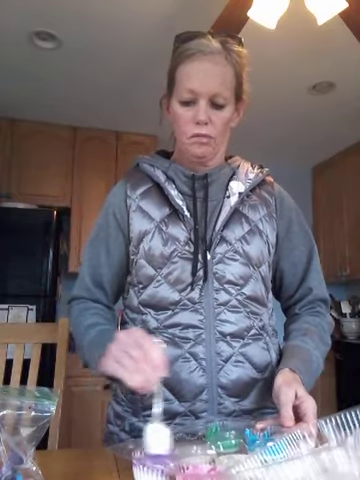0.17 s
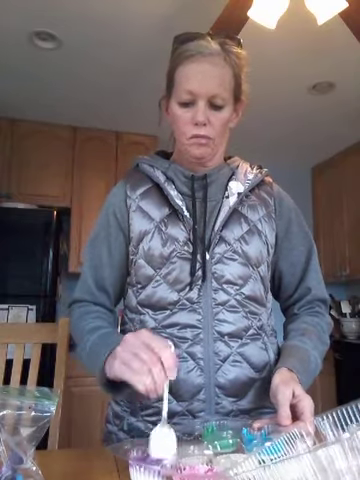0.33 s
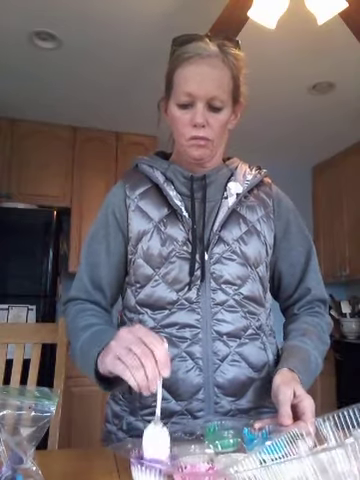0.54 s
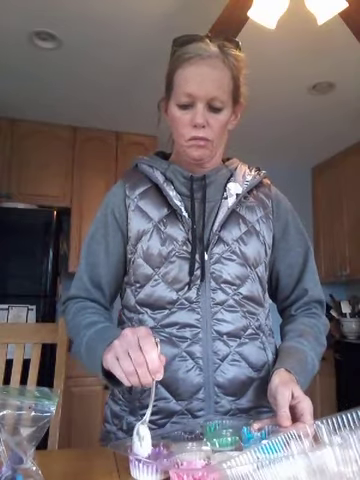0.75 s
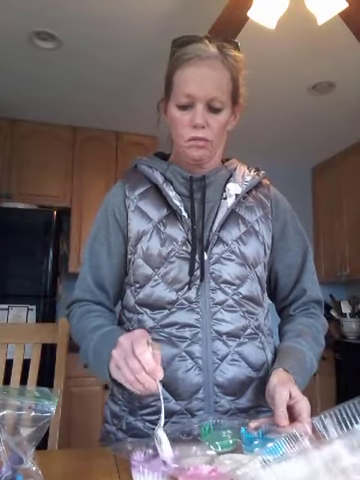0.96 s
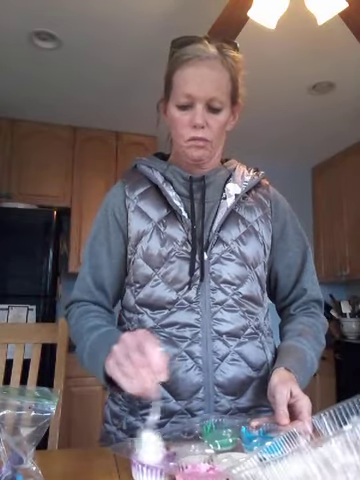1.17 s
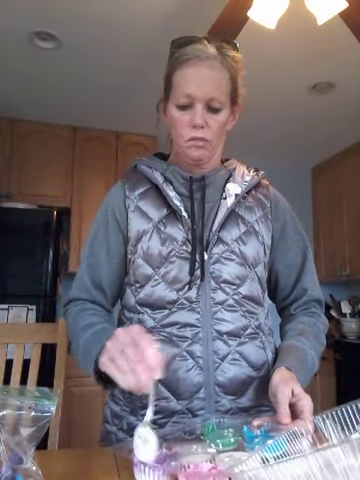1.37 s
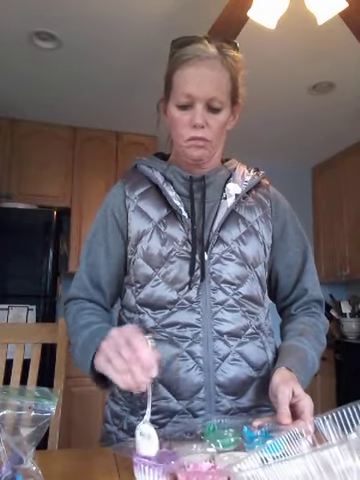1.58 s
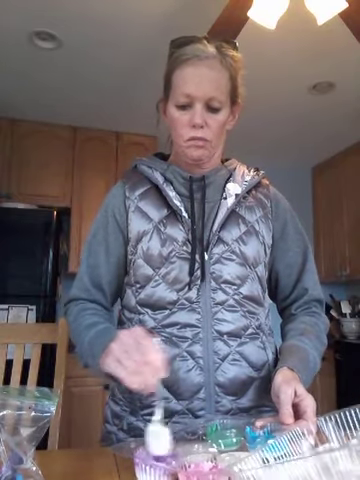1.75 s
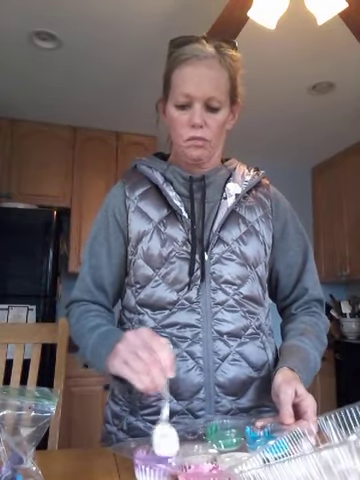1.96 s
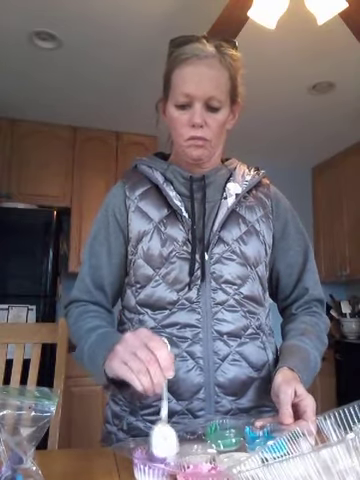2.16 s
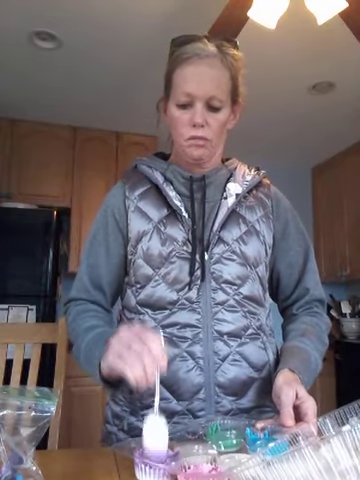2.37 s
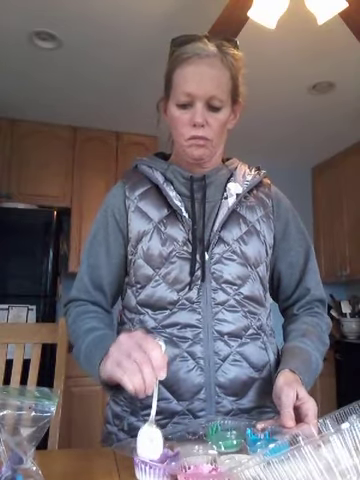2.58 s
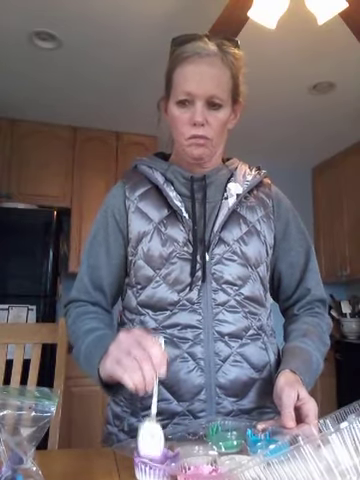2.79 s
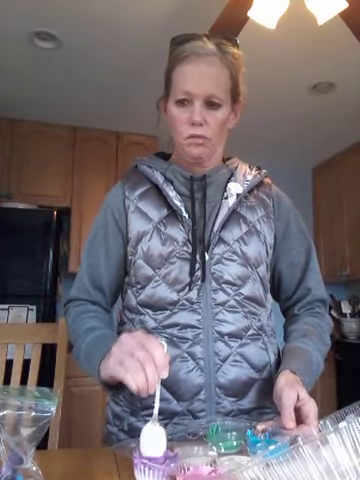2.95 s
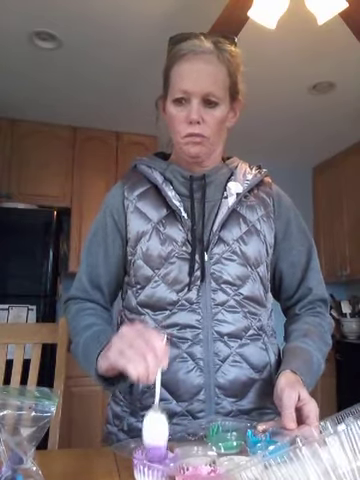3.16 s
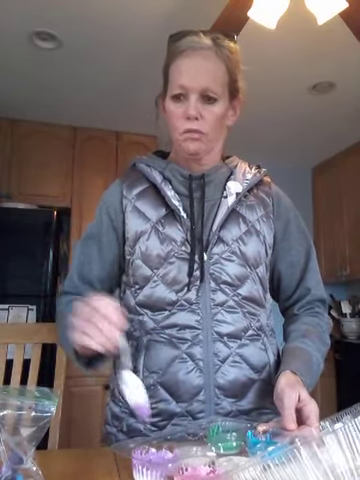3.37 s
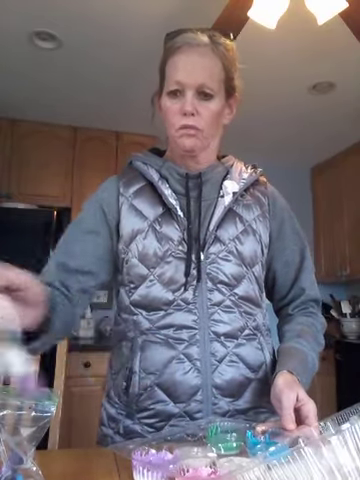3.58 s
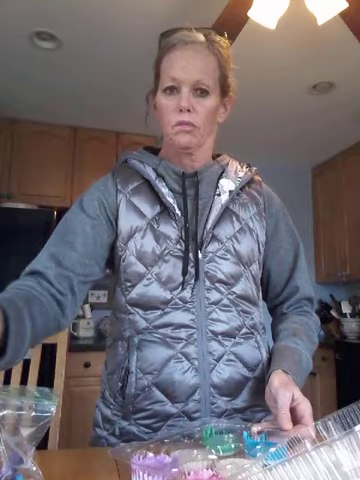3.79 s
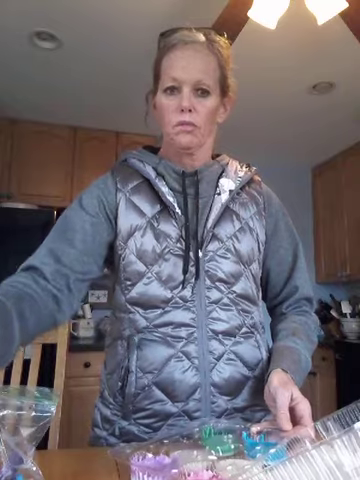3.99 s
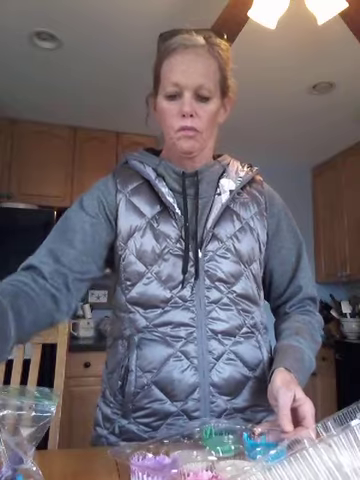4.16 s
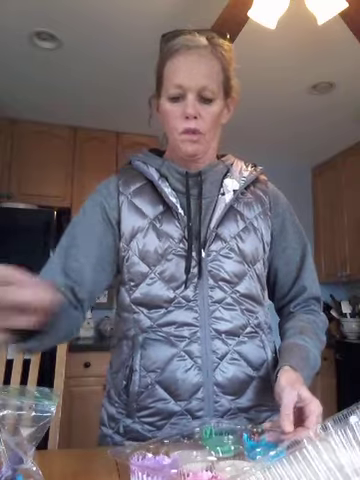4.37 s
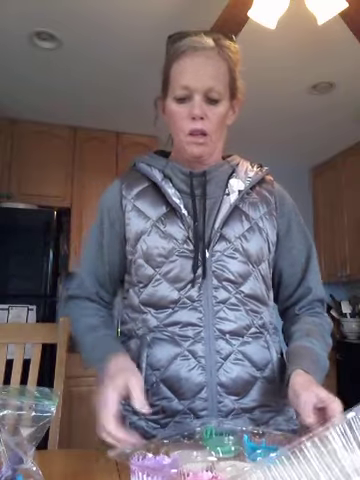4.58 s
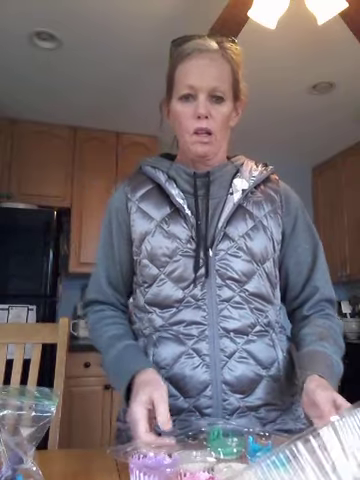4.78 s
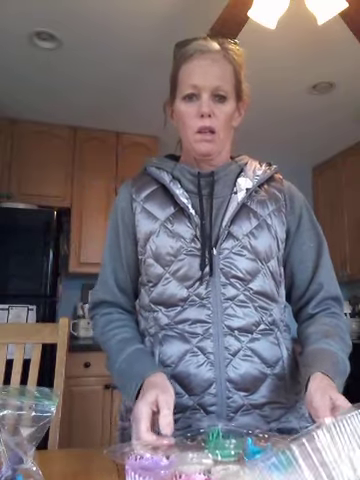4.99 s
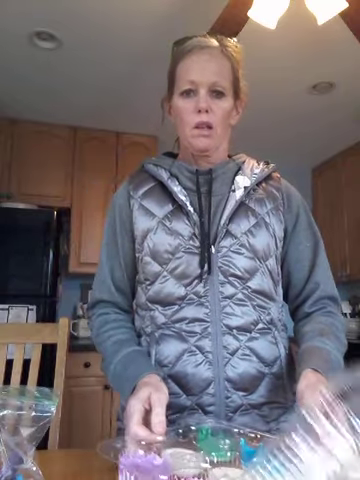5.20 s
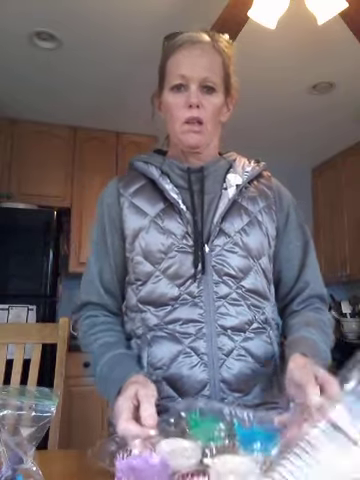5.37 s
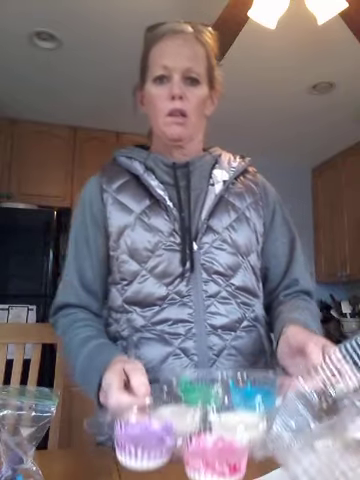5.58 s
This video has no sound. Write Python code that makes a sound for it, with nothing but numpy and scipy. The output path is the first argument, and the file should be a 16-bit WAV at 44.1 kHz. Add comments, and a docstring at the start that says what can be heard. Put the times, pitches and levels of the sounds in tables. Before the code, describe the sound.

Bright, brittle plastic clicks and gritty paper scraping come quickly over muffled table bumps for about two seconds. Then five knocks, four loud and woody, the last lighter with a sharp crackle. A sleeve brushes, a spoon lands in quick metallic bounces, and small touches and ticks fade into quiet hiss. A small, hard kitchen with short echoes, heard by a phone very near on the table.

```python
"""In a small hard kitchen, a spoon works a thick mixture in a paper cup on a thin plastic tray.
The tray crackles in short noise bursts, the table thumps and rings, the spoon drags in many tiny slips.
Five raps shake the spoon clean, then it is dropped aside and bounces, ringing; a sleeve rustles.
The kitchen answers with echoes, the phone's port rings near 6 kHz, and a soft hiss lies under it all."""
import sys
import numpy as np
from scipy import signal
from scipy.fft import rfft, irfft, next_fast_len
from scipy.io import wavfile

SR = 44100
rng = np.random.default_rng(int(sys.argv[2]) if len(sys.argv) > 2 else 0)


def bounce(signal):
    """Save signal as a 16-bit WAV file at the path given by the first command-line argument."""
    frames = np.transpose(np.atleast_2d(signal))
    limited = np.clip(frames, -1, 1)
    pcm = np.round(limited * 32767).astype(np.int16)
    wavfile.write(sys.argv[1], SR, pcm)


def ratio_of_db(decibels):
    """Turn decibels (scalar or array-like) into linear amplitude factors; 0 dB maps to 1."""
    return 10 ** (np.asarray(decibels, float) / 20)


N = 248590  # length in samples
PORT_HZ, PORT_WIDTH_HZ, PORT_DB = 6300, 720, 14  # resonance of the phone's port


def conv(x, h):
    """Convolution cut to the length of the scene."""
    return signal.fftconvolve(x, h)[:N]


def band(x, lo_hz, hi_hz, order=2):
    """Butterworth band-pass: keeps what lies between two frequencies."""
    edges_hz = [lo_hz, min(hi_hz, .49 * SR)]
    return signal.sosfilt(signal.butter(order, edges_hz, "band", fs=SR, output="sos"), x)


def along(table, hz):
    """Reads (Hz, value) points on a log frequency axis."""
    f, v = np.transpose(table)
    return np.interp(np.log(np.maximum(hz, 1)), np.log(f), v)


def peak1(x):
    """Scales to a peak of 1."""
    return x / np.max(np.abs(x))


def rms1(x):
    """Scales to an rms of 1."""
    return x / np.sqrt(np.mean(x ** 2))


def add(out, s, x):
    """Mixes x in at time s."""
    i = max(int(s * SR), 0)
    out[i:i + len(x)] += x[:N - i]


def ring(modes, scatter_db):
    """One strike of an object: a sum of dying sines, each excited a little differently."""
    t = np.arange(SR // 2) / SR
    hz, db, t60 = np.transpose(modes)[:, :, None]
    db = db + scatter_db * rng.standard_normal(db.shape)
    return np.sum(ratio_of_db(db - 60 * t / t60) * np.sin(2 * np.pi * hz * t), axis=0)


def burst(ms, chatter):
    """A sharp first contact, then a noisy chatter that dies with time constant ms."""
    t = np.arange(SR // 20) / SR
    x = chatter * rng.standard_normal(len(t)) * np.exp(-1000 * t / max(ms, .1))
    x[0] = 1
    return x


def push(ms, chatter):
    """A sharp first contact, then a rough pressure that swells for ms and eases off."""
    t = 1000 * np.arange(SR // 12) / SR / max(ms, .1)
    x = chatter * rng.standard_normal(len(t)) * t * np.exp(1 - t)
    x[0] = 1
    return x


def slips(share, spread_db):
    """Tiny slips on a share of the samples, a few much larger than the rest."""
    happens = rng.random(N) < share
    return rng.standard_normal(N) * happens * ratio_of_db(spread_db * rng.exponential(size=N))


# Colour of the background hiss, only relative: f/Hz, level/dB (per Hz)
HISS_COLOUR = [(18, -63.5), (30, 7.5), (124, -12.5), (273, -18), (303, -5), (336, -20), (684, -17.5),
               (1280, -21), (3400, -24), (3770, -32), (6050, -31), (10500, -33), (16000, -35.5)]


def floor():
    """The still room and the microphone's own hiss: steady noise shaped in frequency."""
    hz = np.fft.rfftfreq(next_fast_len(N + SR), 1 / SR)
    white = rfft(rng.standard_normal(2 * len(hz) - 2))
    hiss = irfft(white * ratio_of_db(along(HISS_COLOUR, hz)))[:N]
    return ratio_of_db(-61) * rms1(hiss)


# How long the kitchen's tail takes to fall by 60 dB: f/Hz, t60/s
TAIL_T60 = [(60, 0.36), (160, 0.98), (420, 0.4), (1100, 0.56), (2900, 0.44), (6500, 0.41), (10000, 0.26),
            (16000, 0.26)]
# Balance of the kitchen's tail, only relative: f/Hz, level/dB
TAIL_COLOUR = [(60, -28.5), (130, 5), (260, -2), (600, 6), (1500, 0), (3500, -2), (6500, -5.5),
               (10000, -9.5), (16000, -13)]
# Balance of the quick echoes, only relative: f/Hz, level/dB
QUICK_ECHO_COLOUR = [(100, 25.5), (500, -0.5), (2000, 9), (6000, -5), (14000, -10)]
EARLY_T60 = 0.04  # s


def kitchen(x):
    """Quick echoes off table and cupboards, then a diffuse tail that dies band by band."""
    t = np.arange(int(.9 * SR)) / SR
    h = 0
    for hz in 60 * 2 ** np.arange(0, 8.4, .5):  # half-octave steps
        tail = ratio_of_db(along(TAIL_COLOUR, hz) - 60 * t / along(TAIL_T60, hz))
        early = ratio_of_db(along(QUICK_ECHO_COLOUR, hz) - 60 * t / EARLY_T60)
        noise = band(rng.standard_normal(len(t)), hz / 2 ** 0.23, hz * 2 ** 0.33)
        h = h + (tail + early) * noise
    fade_in = 1 - np.exp(-t / 0.0016)
    return conv(x, ratio_of_db(-31.5) * h * fade_in)


# Pressure of the spoon on the paper, as the level of its drag: t/s, level/dB
STIR_PRESSURE = [(0,-34.5),(.13,-51.5),(.3,-42.5),(.46,-57.5),(.53,-68.5),(.67,-106),(.73,-46.5),(1.0,-53.5),(1.43,-50.5),(1.5,-72),(1.62,-48),(1.72,-62.5),(1.85,-49),(2.14,-49),(2.29,-77)]


def stir_db(t):
    """Pressure of the stirring spoon at time t, in dB; practically none after the last point."""
    return np.interp(t, *np.transpose(STIR_PRESSURE), right=-120)


# Ringing modes of the table top, levels only relative: f/Hz, level/dB, t60/s
TABLE_MODES = [(63, -11, .7), (71, -15, .5), (139, 1, .55), (194, -4, .3), (240, -6, .25), (297, -3, .38),
               (385, -9, .2), (511, -6, .2), (572, -8, .35), (641, -10, .15), (808, -7, .2),
               (911, -11, .15), (1010, -10, .15), (1202, -11, .12)]


def rumble():
    """The stirring shakes the table, whose lowest modes hum along."""
    pressure = ratio_of_db(stir_db(np.arange(N) / SR))
    low = ring([mode for mode in TABLE_MODES if mode[0] < 100], scatter_db=0)
    low = low / np.sqrt(np.sum(low ** 2))  # unit energy
    return ratio_of_db(-6) * conv(pressure * slips(0.067, spread_db=2.5), low)


# Sleeve and hands brushing, and the dropped spoon settling at 4.16 s: t/s, hold/s, dull level/dB, bright
# level/dB
BRUSHES = [(3.6,0.27,-67.5,-91.5),(4.16,0.049,-49,-68),(4.777,0.023,-55.5,-59),(4.871,0.0069,-48.5,-50),(4.93,0.25,-61,-68),(5.206,0.0074,-60,-59.5),(5.608,.04,-82,-72)]
RUSTLE_ATTACK_S, RUSTLE_RELEASE_S = 0.014, 0.016  # time constants


def rub():
    """Gritty slips on paper, then smoother ones of cloth; under both a dull drag."""
    t = np.arange(N) / SR
    drag = rms1(band(slips(.2, spread_db=0.5), 150, 1500, order=1))
    # few slips sound gritty, many sound smooth
    paper = rms1(band(slips(.06, spread_db=2), 2600, 9500, order=1))
    cloth = rms1(band(slips(.4, spread_db=2), 2600, 9500, order=1))
    out = ratio_of_db(stir_db(t)) * (drag + ratio_of_db(-6) * paper)
    for s, hold, dull_db, bright_db in BRUSHES:
        rise = np.minimum(0, (t - s) / RUSTLE_ATTACK_S)
        fall = np.minimum(0, (s + hold - t) / RUSTLE_RELEASE_S)
        shape = np.exp(rise + fall)
        out += shape * (ratio_of_db(dull_db) * drag + ratio_of_db(bright_db) * cloth)
    return out


# Ringing modes of the steel spoon, levels only relative: f/Hz, level/dB, t60/s
SPOON_MODES = [(2870, 0, .018), (4210, -23, .12), (5450, 1, .012), (6560, -4, .025), (7750, -4, .02),
               (8500, -3, .015), (9050, -20, .12), (10850, -6, .012), (10900, -25, .1), (11700, -7, .01),
               (13960, -12, .008)]
# Bounces of the dropped spoon: t/s, ring level/dB, rattle/ms, thud level/dB, clack level/dB
SPOON_BOUNCES = [(4.0248,-24,3,-7.5,-13.5),(4.035,-27,7.6,-35,-18),(4.0455,-27.5,4.5,-39,-19),(4.127,-14.5,2.06,-17,-8.5),(4.149,-34,2.1,-45,-33.5),(4.2557,-25,2.5,-42,-11.5),(4.456,-61.5,2.9,-35,-26.5)]


def spoon():
    """Steel coated in sticky mixture rattles and rings only briefly at every bounce."""
    out = np.zeros(N)
    for s, db, ms, _, _ in SPOON_BOUNCES:
        struck = signal.fftconvolve(burst(ms, chatter=.6), ring(SPOON_MODES, scatter_db=2.5))
        add(out, s, ratio_of_db(db) * peak1(struck))
    return out


# Bumps of spoon, cup and hands: t/s, level/dB, centre of the thud f/Hz, upper level/dB
BUMPS = [(.009,-36,570,-18),(0.152,-25,314,-7),(.28,-26.5,900,-10),(0.39,-20,540,-9.5),(.682,-28,520,-25),(.751,-29,910,-17),(.891,-27.5,930,2.5),(1.078,-29.5,950,2.5),(1.258,-29,253,-17),(1.382,-30,322,0.5),(1.503,-29,400,-5),(1.515,-21,460,-14),(1.612,-37,252,2),(1.727,-23,435,-9),(1.851,-36.5,251,8.5),(1.961,-25,414,-10.5),(2.082,-36,392,10.5),(2.188,-20,381,-10.5),(3.8632,-37.5,200,-29),(3.898,-28,493,-25.5),(3.944,-43.5,292,-25),(4.6917,-42,650,-1.5),(4.867,-48,506,-14),(5.03,-47,696,-12),(5.106,-43,681,-3),(5.595,-46.5,400,-6)]
# Raps that shake the spoon clean: t/s, level/dB, centre of the thud f/Hz
SPOON_RAPS = [(2.4699,-8.5,547),(2.6517,-10,547),(2.82,-10,540),(3.0253,-10,510),(3.229,-20,960)]
# table ring over the thud: for bumps and raps it weakens when the thud is centred above the pivot
BUMP_WOOD_DB, RAP_WOOD_DB, BOUNCE_WOOD_DB = -5, 2, -18
WOOD_DB_PER_OCTAVE, WOOD_PIVOT_HZ = -7.5, 400
RAP_UPPER_DB, BOUNCE_UPPER_DB, BOUNCE_HZ = -2.5, -28, 640
CONTACT_MS, SOFTER_MS_PER_DB = 1.8, 0.49  # softer blows press longer


def wood_db(db, hz):
    """Level of the table's ring: higher-pitched blows excite it less."""
    return db + WOOD_DB_PER_OCTAVE * max(np.log2(hz / WOOD_PIVOT_HZ), 0)


def knocks():
    """Each blow is a broad dull thud into the air and a ring of the table top under the phone."""
    thuds, rings = np.zeros(N), np.zeros(N)
    blows = [(s, db, hz, up, wood_db(BUMP_WOOD_DB, hz)) for s, db, hz, up in BUMPS]
    blows += [(s, db, hz, RAP_UPPER_DB, wood_db(RAP_WOOD_DB, hz)) for s, db, hz in SPOON_RAPS]
    blows += [(s, db, BOUNCE_HZ, BOUNCE_UPPER_DB, BOUNCE_WOOD_DB) for s, _, _, db, _ in SPOON_BOUNCES]
    for s, db, hz, upper_db, ring_db in blows:
        x = push(CONTACT_MS - SOFTER_MS_PER_DB * db, chatter=0.02)
        body = peak1(band(x, hz / 2.61, hz * 1.627))
        upper = peak1(band(x, 1330, 2437))
        add(thuds, s, ratio_of_db(db) * (body - ratio_of_db(upper_db) * upper))
        table_ring = peak1(signal.fftconvolve(x, ring(TABLE_MODES, scatter_db=3.5)))
        add(rings, s, ratio_of_db(db + ring_db) * table_ring)
    return thuds, rings


def crackle(out_db, dull_db, mid_db, ms):
    """Thin plastic buckles: a broad click with its share of body and middle."""
    x = burst(ms, chatter=0.16)
    click = peak1(band(x, 6350, 12860))
    # the body lies where the port resonates, so it starts lower by the port's lift
    body = ratio_of_db(dull_db - PORT_DB) * peak1(band(x, 5110, 6830, order=1))
    middle = ratio_of_db(mid_db) * peak1(band(x, 1400, 6860))
    return ratio_of_db(out_db) * (click + body + middle)


# Single crackles and faint ticks: t/s, level/dB, dullness level/dB
SINGLE_CRACKLES = [(0.0363,-32.5,18),(0.0605,-20,6),(0.0707,-13.5,-18),(0.0881,-22,17),(0.1523,-23.5,11.5),(0.1814,-22,-3),(.1879,-17.5,6),(0.22,-18.5,4),(0.2556,-27,16.5),(0.2672,-16,5.5),(.2413,-28,2),(0.2813,-23.5,13.5),(0.291,-22,-7),(.3126,-28,3),(0.361,-25.5,6.5),(.3035,-11,-3),(0.3208,-8,-6),(.389,-27.5,21),(0.397,-21,12),(0.4235,-6.5,-8),(0.579,-38,5),(0.6173,-41.5,9),(.68,-27,11.5),(0.7518,-28,22),(0.7917,-20.5,5.5),(0.8176,-17.5,9),(0.8408,-26,11),(0.8935,-18,11.5),(0.9153,-9.5,0.5),(0.9937,-26.5,6.5),(1.0783,-13,10.5),(1.138,-39.5,22.5),(1.196,-31,17.5),(1.2151,-20.5,-6),(1.2847,-12.5,16),(1.304,-7.5,-22.5),(1.3316,-16.5,-3.5),(1.383,-32,10),(1.502,-19,5),(1.52,-20,14.5),(1.538,-15.5,4.5),(1.596,-8.5,8),(1.613,-26.5,12.5),(1.725,-24,2.5),(1.7558,-25,-7),(1.8322,-31,16),(1.8546,-26,13),(1.859,-12.5,2.5),(1.8825,-22,-14),(1.8999,-7,-11.5),(1.9646,-22.5,7),(1.987,-22.5,-8.5),(1.9954,-16.5,-6),(2.017,-6.5,-16.5),(2.063,-25.5,-6),(2.0824,-17,4),(2.11,-26,11.5),(2.1914,-32.5,12.5),(2.238,-9.5,-13.5),(3.233,-9,13.5),(3.8631,-37.5,5),(3.9,-47.5,-1),(4.001,-51,-2.5),(4.43,-46,-8),(4.5376,-43.5,6),(4.692,-53.5,15.5),(5.538,-50.5,5.5),(5.5474,-50.5,7),(5.5661,-50,6),(5.5973,-48.5,13)]
# a duller crackle carries more middle (dB, dB per dB, dB)
MIDDLE_DB, MIDDLE_SLOPE, MIDDLE_SCATTER_DB = -6.5, 0.65, 5.5
BURST_MS = 1.08  # typical; each crackle varies around it
# small random crackles: level over the stirring pressure, scatter either way, mean dullness
SMALL_DB, SMALL_SCATTER_DB, SMALL_DULL_DB = 13.5, 8, 1.5
SMALL_COUNT, STIR_END_S = 45, 2.25
TICK_DB, TICK_DULL_DB, TICK_MIDDLE_DB, TICK_MS = -27, 3, 18, 2.1  # the tick on top of each rap
CLACK_DULL_DB, CLACK_MIDDLE_DB = 1.5, -1.5  # the clack of each bounce


def crackles():
    """Single crackles and faint ticks, random ones over the stirring, ticks of raps, clacks of bounces."""
    out = np.zeros(N)
    when, size, hue = rng.random((SMALL_COUNT, 3)).T
    when = when * STIR_END_S
    small_db = stir_db(when) + SMALL_DB + SMALL_SCATTER_DB * (2 * size - 1)
    small_dull_db = SMALL_DULL_DB + SMALL_SCATTER_DB * (2 * hue - 1)
    for s, db, dull_db in list(SINGLE_CRACKLES) + list(zip(when, small_db, small_dull_db)):
        a, b = rng.standard_normal(2)
        mid_db = MIDDLE_DB + MIDDLE_SLOPE * dull_db + MIDDLE_SCATTER_DB * a
        add(out, s, crackle(db, dull_db, mid_db, BURST_MS * np.exp(0.52 * b)))
    for s, db, _ in SPOON_RAPS:
        add(out, s, crackle(db + TICK_DB, TICK_DULL_DB, TICK_MIDDLE_DB, TICK_MS))
    for s, _, ms, _, clack_db in SPOON_BOUNCES:
        add(out, s, crackle(clack_db, CLACK_DULL_DB, CLACK_MIDDLE_DB, ms))
    return out


def scene():
    """Airborne sources come with their echoes; the table's ring and rumble arrive directly."""
    thuds, rings = knocks()
    air = crackles() + thuds + spoon() + rub()
    return np.array([air + kitchen(air) + rings + rumble() + floor()])


def top_cut(x):
    """Nothing passes above the cut-off."""
    return signal.sosfilt(signal.butter(12, 17330, fs=SR, output="sos"), x)


def record(dry):
    """The port resonance lifts the treble, the lowest bass is cut steeply, the loudest peaks are rounded."""
    port = signal.lfilter(*signal.iirpeak(PORT_HZ, PORT_HZ / PORT_WIDTH_HZ, fs=SR), dry)
    bass_cut = signal.butter(5, 58, "high", fs=SR, output="sos")
    x = signal.sosfilt(bass_cut, dry + (ratio_of_db(PORT_DB) - 1) * port)
    return top_cut(0.89 * np.tanh(x / 0.9))


dry = scene()
out = record(dry)
bounce(out)
```